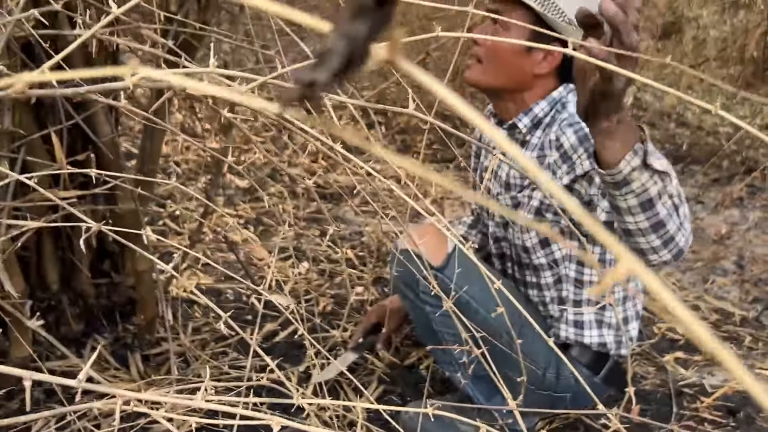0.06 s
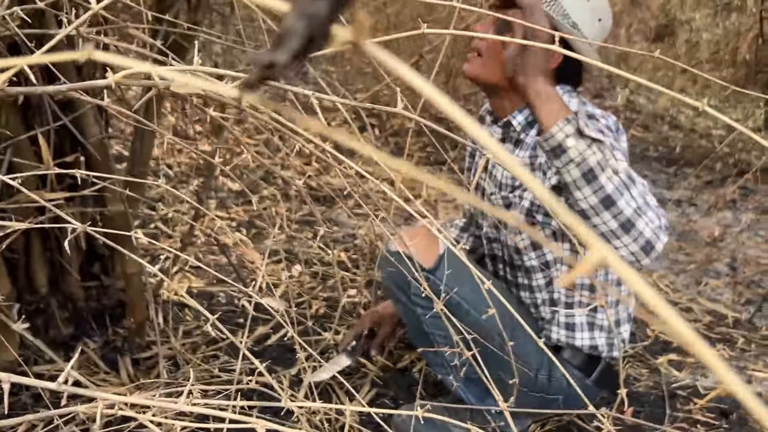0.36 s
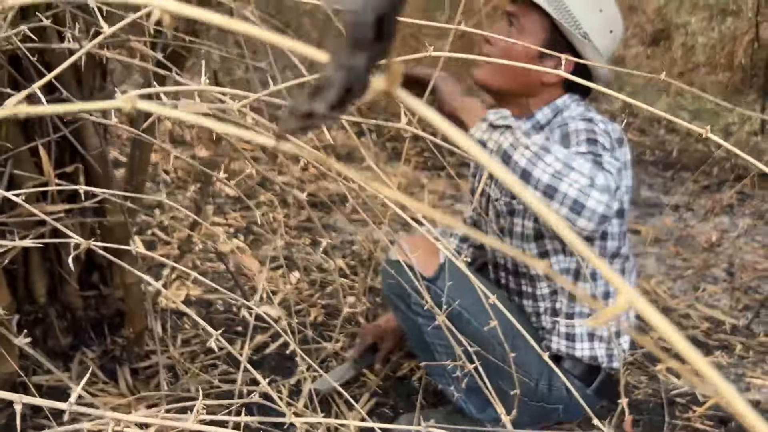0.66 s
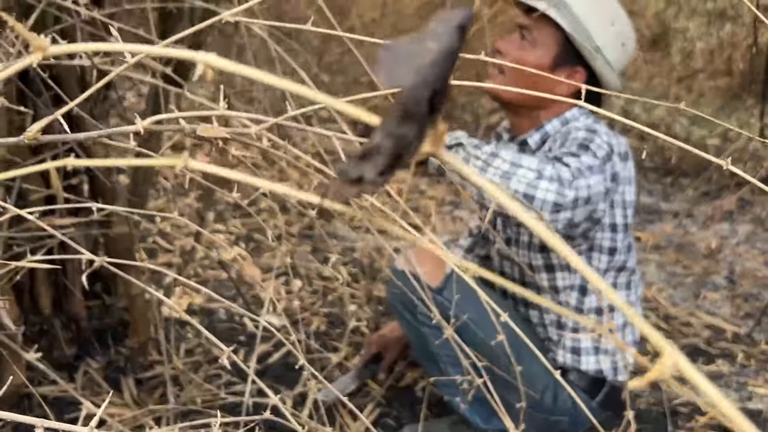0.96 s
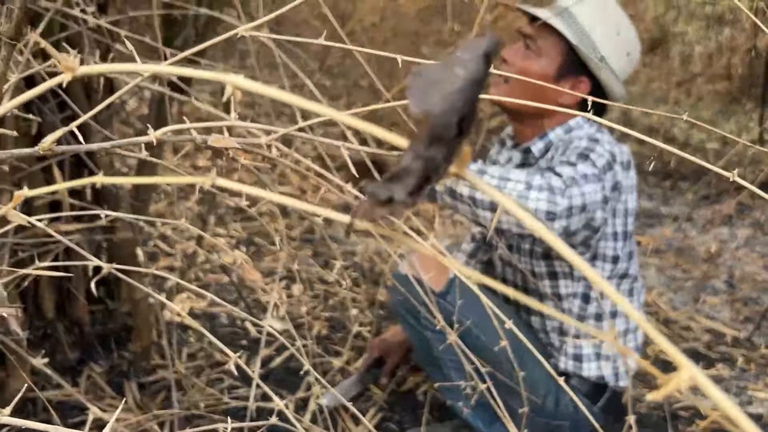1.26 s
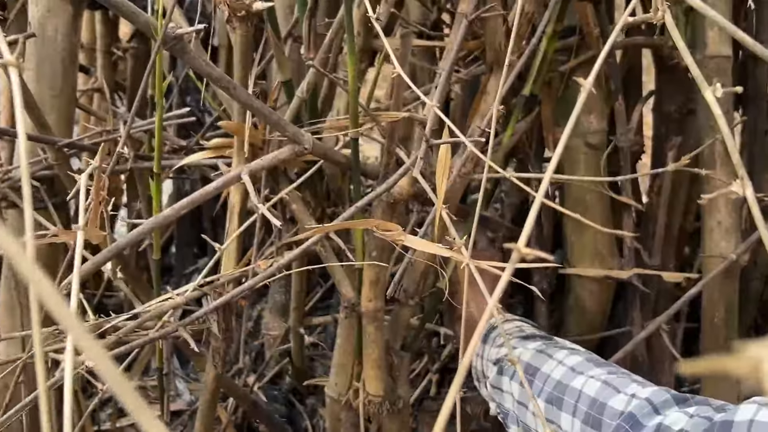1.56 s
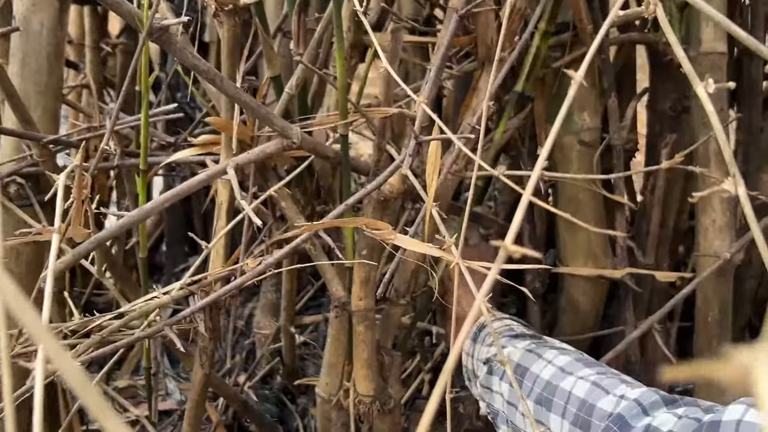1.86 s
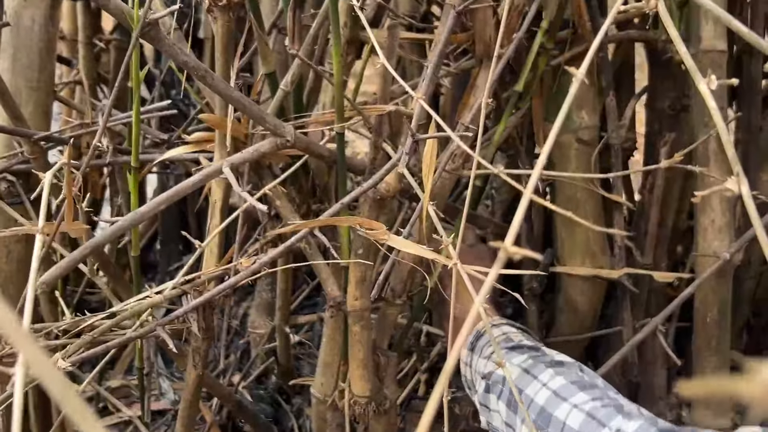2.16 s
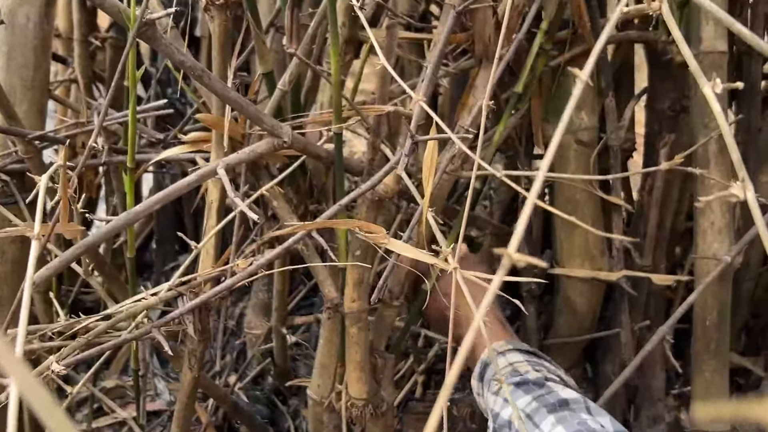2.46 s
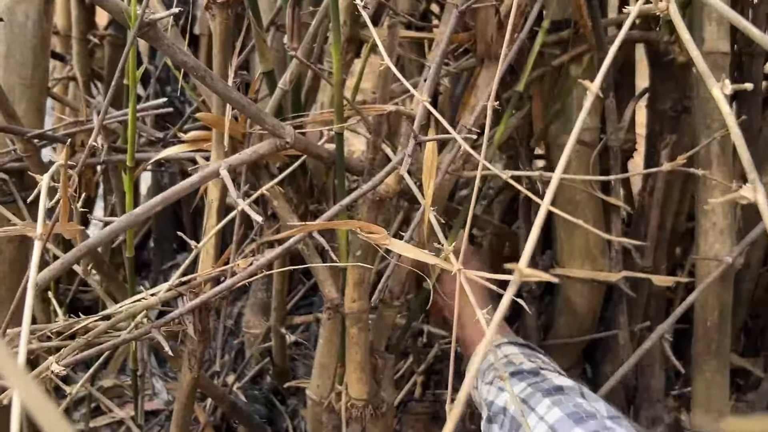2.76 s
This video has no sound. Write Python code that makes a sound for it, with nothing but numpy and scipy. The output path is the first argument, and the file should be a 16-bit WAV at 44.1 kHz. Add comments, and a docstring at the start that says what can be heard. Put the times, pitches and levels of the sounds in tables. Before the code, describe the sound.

A hand works into a dry bamboo thicket outdoors, close to the microphone. It opens with a soft low bump and a tiny stem creak, then dead leaves rustle faintly with small twig ticks. The sound drops out for an instant at about 1.3 seconds. At 1.9 seconds a cane splits with one sharp crack, by far the loudest event. Thin twigs snap and leaves crackle from 2.3 to 3 seconds, then more sparsely, while a sleeve rubs softly on the stems. Two stems knock together sharply at 3.8 seconds, and a twig snaps at 4.1. From 5.4 to about 6.2 seconds comes a thicker, louder flurry of snaps and crisp rustling, with a few dull thuds. A low rumble of air on the microphone and a faint distant wash lie underneath throughout.

```python
"""Outdoors in a bamboo thicket, a hand pushes in among the dry stems.
One cane cracks loudly and twigs snap as their fibres tear. Dead leaves rustle and crackle with
countless tiny breaks, bumped stems knock, thud and creak, and a sleeve rubs along them.
Under it lie a low rumble of air on the microphone and a faint wash from far away.
The sound enters two close microphone openings (ports), and the level dips briefly once."""
import sys
import numpy as np
from scipy import signal
from scipy.fft import rfft, irfft
from scipy.io import wavfile
from scipy.ndimage import uniform_filter1d

SR = 44100
rng = np.random.default_rng(int(sys.argv[2]) if len(sys.argv) > 2 else 0)


def master_out(mix):
    """Clip the mix to full scale and print it as 16-bit PCM to the path in sys.argv[1]."""
    frames = np.transpose(np.atleast_2d(mix))
    ceiling = np.clip(frames, -1, 1)
    pcm = np.round(ceiling * 32767).astype(np.int16)
    wavfile.write(sys.argv[1], SR, pcm)


N = 283322
TIME = np.arange(N) / SR
HZ = np.fft.rfftfreq(N, 1 / SR)

# A "colour" says how strong each frequency is. A "mode" is a note that an object rings at.
CANE_CRACKS = [(1.8764, -14)]  # the cane splitting: t/s, level/dB
CANE_MODES = [(410, 44, -13), (2197, 100, -5.5), (3370, 100, -65), (5000, 260, 6), (5380, 110, -16.5),
              (6000, 110, -4.5), (7040, 170, 11), (7500, 390, -18.5), (8170, 130, 5.5), (9320, 120, -4),
              (10300, 72, -28.5), (10600, 180, -52.5)]  # its ringing wall: f/Hz, width/Hz, level/dB
FIBRE_COLOUR = [(100, -37), (400, -5.5), (1400, 1), (3500, 12.5), (7000, -1.5), (10000, 14), (12000, -6),
                (15700, -11.5)]  # its tearing fibres: f/Hz, level/dB
SHIVER_COLOUR = [(100, -20), (400, 3.5), (900, 2), (1400, 8.5), (2200, 5), (3500, -2), (8000, -2),
                 (11000, -8), (15700, -21)]  # the split cane shaking: f/Hz, level/dB
TWIG_SNAPS = [(0.083, -52.5, 3580, 0.0033), (0.5735, -50, 4400, 0.004), (0.607, -56.5, 4990, 0.0025),
              (0.7285, -41.5, 6000, 0.0028), (0.8051, -46.5, 6200, 0.0032), (0.8272, -51, 5270, 0.003),
              (0.852, -59, 5070, 0.0065), (0.9063, -58, 5000, 0.0054), (1.002, -53.5, 6300, 0.0072),
              (1.0757, -49.5, 5760, 0.0055), (1.2067, -54, 6760, 0.0018), (1.4621, -53, 4670, 0.0078),
              (1.917, -40, 7740, 0.006), (2.079, -60, 7440, 0.0041), (2.096, -53, 3900, 0.0029),
              (2.208, -62, 8000, 0.0052), (2.3301, -36.5, 7500, 0.0034), (2.3357, -38, 8120, 0.0053),
              (2.3475, -48, 7240, 0.0045), (2.3594, -43.5, 8000, 0.0095), (2.39, -48.5, 7010, 0.0053),
              (2.5196, -48, 8030, 0.0069), (2.6148, -46, 8400, 0.0037), (2.7193, -45, 7690, 0.006),
              (2.913, -49.5, 7340, 0.0051), (3.115, -56, 5860, 0.0056), (3.3982, -51, 4730, 0.0017),
              (3.7735, -39.5, 3350, 0.0054), (3.9188, -52.5, 8200, 0.0076), (4.0205, -47, 8500, 0.0065),
              (4.1024, -38, 7500, 0.0057), (4.5396, -54, 6730, 0.012), (4.617, -55, 5000, 0.0045),
              (4.8526, -53, 8380, 0.011), (4.9457, -55.5, 2620, 0.0096), (5.1062, -52.5, 7600, 0.009),
              (5.1978, -53.5, 7260, 0.0024), (5.3705, -47.5, 8000, 0.0072), (5.4209, -37.5, 6000, 0.0024),
              (5.5064, -34, 6610, 0.0046), (5.5216, -31.5, 8950, 0.0048), (5.537, -31.5, 5500, 0.0031),
              (5.5484, -46, 7110, 0.0049), (5.6935, -48, 7700, 0.003), (5.876, -30.5, 8700, 0.0011),
              (5.9289, -41.5, 4060, 0.008), (5.9492, -35, 8000, 0.0044), (5.9554, -38.5, 5900, 0.0057),
              (5.985, -37.5, 7100, 0.0053), (6.006, -39.5, 7070, 0.006), (6.0112, -45, 7980, 0.006),
              (6.0695, -39, 6000, 0.0068), (6.099, -44, 7370, 0.0055)]  # twigs breaking: t/s, level/dB, centre f/Hz, length/s
TWIG_COLOUR = [(100, -64.5), (500, 10.5), (1500, -1.5), (3200, 4), (5000, 6.5), (8000, 8), (10000, 7.5),
               (12000, -2), (15700, -12)]  # shared by all twigs: f/Hz, level/dB
# the hand brushing the leaves: t/s, length/s, level/dB, fizz (top treble) compared with that level/dB
HAND_BRUSHES = [(0.0, 0.083, -67, -4), (0.125, 0.1, -67.5, -6), (0.348, 0.21, -71, -3.5),
                (0.493, 0.045, -60, -4), (0.574, 0.13, -62, 0), (0.76, 0.12, -65, -4.5),
                (0.86, 0.31, -71, -5), (1.401, 0.038, -65, -5), (1.58, 0.0094, -69, -6.5),
                (1.792, .06, -62.5, -8), (1.887, 0.057, -53.5, 1.5), (2.069, 0.074, -66.5, -0.5),
                (2.237, 0.056, -70.5, -1), (2.319, 0.028, -54.5, -3.5), (2.46, 0.18, -59.5, 1),
                (2.649, 0.12, -56, -0.5), (2.776, 0.094, -63, -2), (2.942, 0.046, -71, 4.5),
                (3.125, 0.047, -67.5, -2.5), (3.159, 0.13, -61.5, -2), (3.367, 0.067, -62.5, -3.5),
                (3.587, 0.038, -66.5, -1.5), (3.651, 0.16, -70.5, 5.5), (3.846, 0.046, -71.5, -2),
                (3.985, 0.033, -67, 5), (4.1, .06, -62, -3), (4.194, 0.068, -66, 2.5),
                (4.297, 0.085, -73.5, -6), (4.529, .015, -69.5, -2), (4.589, 0.024, -65, -2.5),
                (4.785, .08, -69.5, 3.5), (4.939, 0.068, -65.5, 0.5), (5.098, 0.034, -71, 0),
                (5.143, 0.054, -73, -1), (5.313, 0.28, -62, 0.5), (5.5, 0.027, -46, 0.5),
                (5.517, 0.44, -58.5, 1.5), (5.898, 0.1, -51, -5), (6.05, 0.064, -56.5, -1),
                (6.087, .12, -58.5, -6), (6.284, 0.23, -68, -10)]
LEAF_COLOUR = [(100, -28), (700, -5), (1700, -4.5), (2400, 0), (4800, 1), (6200, -1.5), (8200, 2),
               (10000, -1), (12000, -15), (14000, -21.5), (15700, -23.5)]  # dead leaves rustling: f/Hz, level/dB
FAR_LEAF_COLOUR = [(1500, -4), (5000, 4), (9500, -1.5), (12000, -6), (15700, -8)]  # extra tint on the first, farther leaves: f/Hz, level/dB
CRINKLE_COLOUR = [(500, -22), (2000, -5), (4500, -3.5), (8000, -0.5), (12000, -13.5), (15700, -16.5)]  # leaf veins popping: f/Hz, level/dB
STEM_TAPS = [(3.3182, -52, 1300), (3.318, -49, 2600), (3.7736, -31, 3340), (4.1029, -50.5, 3660),
             (5.4222, -43.5, 3310), (5.507, -39, 3190)]  # thin stems knocking together: t/s, level/dB, f/Hz
TAP_MODES = [(.8, 241, -10.5), (1, 230, 2), (1.14, 260, -12), (1.29, 300, -6), (1.75, 502, -13)]  # a thin stem ringing: multiple of its pitch, width/Hz, level/dB
STEM_THUDS = [(0.002, -33, 95.3, 0.016), (1.287, -55, 564, 0.014), (1.879, -42, 506, 0.011),
              (1.975, -56, 410, 0.01), (2.521, -55.5, 512, 0.017), (2.691, -57, 544, 0.0035),
              (3.392, -59.5, 570, .014), (3.777, -56, 854, 0.015), (4.541, -53.5, 599, 0.0168),
              (5.008, -55.5, 404, 0.013), (5.745, -49, 87.5, 0.043), (6.055, -43, 87, 0.012),
              (6.124, -45.5, 82, 0.051)]  # bumped stems: t/s, level/dB, starting f/Hz, decay/s
HOLLOW_MODES = [(572, 30, 8), (940, 190, -8.5), (1400, 115, -1.5), (1550, 100, -41), (2760, 470, -17.5)]  # the hollow of the creaking stem: f/Hz, width/Hz, level/dB
CREAK_COLOUR = [(120, -22), (280, -3), (450, 3), (1700, -1.5), (3000, -6), (5000, -10), (12000, -40)]  # the creak: f/Hz, level/dB
SLEEVE_RUBS = [(0.0, 0.067, -66), (0.1, 0.99, -77.5), (1.39, 0.45, -71.5), (1.88, 0.098, -62),
               (2.13, 0.064, -68), (2.345, 0.043, -71.5), (2.51, 0.082, -68), (2.665, 0.1, -65.5),
               (3.375, 0.042, -68), (3.77, 0.055, -73), (4.535, 0.027, -67), (4.95, .2, -75),
               (5.34, 0.1, -70.5), (5.505, 0.11, -58.5), (5.6, 0.38, -59.5), (6.05, .3, -65)]  # the sleeve sliding on stems: t/s, length/s, level/dB
RUB_COLOUR = [(40, -18), (130, 1), (350, 2), (550, -4.5), (800, -8.5), (1300, -17.5), (2200, -17),
              (5000, -39)]  # cloth rubbing: f/Hz, level/dB
SCRAPE_COLOUR = [(200, -22), (450, -4), (750, 1), (1300, -6), (2200, -15.5), (5000, -30)]  # cloth pressed hard: f/Hz, level/dB
AIR_PUFFS = [(0.0, 0.024, -49.5), (0.18, 0.049, -61.5), (1.88, 0.066, -57.5), (4.55, 0.056, -66.5),
             (5.72, 0.17, -60.5), (6.04, 0.075, -59)]  # puffs hitting the microphone: t/s, length/s, level/dB
DRAUGHT_LEVELS = [(0.0, -67.5), (1.2, -75.5), (2.05, -62.5), (2.4, -73.5), (3.7, -76), (4.4, -72.5),
                  (4.75, -67.5), (5.5, -69.5), (6.42, -59.5)]  # the draught between puffs: t/s, level/dB
RUMBLE_COLOUR = [(10, -28), (30, -17), (55, 3.5), (80, -0.5), (125, -7), (220, -16), (600, -50.5),
                 (2000, -76)]  # puffs and draught: f/Hz, level/dB
AIR_LEVELS = [(0.0, -69), (0.3, -69.5), (0.55, -74), (2.3, -79), (2.7, -74.5), (3.7, -75), (4.2, -71),
              (6.42, -69.5)]  # distant outdoor air: t/s, level/dB
AIR_COLOUR = [(30, -8), (100, -7), (300, -8.5), (650, -5.5), (1100, 6.5), (1450, 3), (1850, -20.5),
              (2600, -12), (5000, -17.5), (9000, -24), (14000, -57.5)]  # its wash: f/Hz, level/dB
AIR_LEAN = [(200, 1.5), (650, 0.5), (1250, 7.5), (1900, 22), (3000, 2), (9000, 13.5)]  # its balance: f/Hz, left minus right level/dB
PORT_PHASE = [(60, 0), (600, -.4), (1450, -1.2), (2200, .5), (4600, .35), (6100, -.9), (7000, .25),
              (8100, -.3), (9600, -3.14), (11400, -6.1), (12400, -6.6), (13600, -9.4), (15000, -12.4)]  # how far the left port leads the right: f/Hz, phase/rad
PORT_LEAN = [(100, 0), (500, -2), (1300, -1), (2400, 2), (4400, 1.5), (8000, 0)]  # balance of the ports: f/Hz, left minus right level/dB

DIP_START_S, DIP_END_S = 1.337, 1.39


def cane_crack(fibres_db=-6, shiver_db=-21, shiver_s=0.018):
    """The cane splits: a run of tearing fibres, the short ring of its wall, then a darker shiver."""
    t, out = np.arange(8192) / SR, np.zeros(N)
    for start, db in CANE_CRACKS:
        pops = tear(t, length_s=.003, spiky_db=1.5, after_db=-16, after_s=.006)
        fibres = amp(fibres_db) * peaked(tint(pops, FIBRE_COLOUR))
        split = peaked(fibres + peaked(ring(CANE_MODES, t)))
        shiver = unit(tint(rng.standard_normal(len(t)), SHIVER_COLOUR)) * np.exp(-t / shiver_s)
        fade = np.cos(np.pi / 2 * t / t[-1])
        add(out, start, amp(db) * (split + amp(shiver_db) * shiver) * fade)
    return out


def twig_snaps(focus_db=5, shiver_db=-21):
    """Twigs tear, thin ones high and thick ones lower. One pop stands out, and big twigs shiver on."""
    t, out = np.arange(-256, 3840) / SR, np.zeros(N)
    hz = np.geomspace(100, 16000, num=24)
    for start, db, centre_hz, length_s in TWIG_SNAPS:
        own_colour = np.transpose([hz, -focus_db * np.log1p(2 * np.log2(hz / centre_hz) ** 2)])
        hardest_pop = 1 + 0.48 * np.exp(-((t - length_s / 4) / 0.00072) ** 2)
        pops = tear(t, length_s, spiky_db=3, after_db=shiver_db + max(db + 40, 0), after_s=0.0057)
        pops = chance_modes(pops * hardest_pop, ripple_db=4, width_bins=30)
        snap = tint(tint(pops, TWIG_COLOUR), own_colour) * (t >= 0)
        add(out, start + t[0], amp(db) * peaked(snap))
    return out


def tear(t, length_s, spiky_db, after_db, after_s):
    """Fibres give way in a quick run of uneven pops, and the splinters shiver on after it."""
    noise, sizes = rng.standard_normal((2, len(t)))
    age = np.maximum(t, 0)
    fade = np.exp(-(age / length_s) ** 2) + amp(after_db) * np.exp(-age / after_s)
    return (t >= 0) * fade * noise * amp(spiky_db * unit(smooth(sizes, 12)))


def chance_modes(x, ripple_db, width_bins):
    """Each twig favours its own random set of frequencies."""
    spectrum = rfft(x)
    bumps = smooth(smooth(rng.standard_normal(len(spectrum)), width_bins), width_bins)
    return irfft(spectrum * amp(ripple_db * unit(bumps)), len(x))


def leaf_rustle(per_s=1500, clump_db=2.5, grain_s=0.0016, level_db=-0.5, fizz_db=-0.5):
    """Countless tiny breaks come in clumps, over the hiss of leaf sliding on leaf."""
    breaks = random_clicks(per_s, size_db=1.5, limit=4.5)
    power = signal.lfilter([1], [1, -np.exp(-2 / (grain_s * SR))], breaks ** 2)  # each dies away
    clumps = unit(smooth(smooth(rng.standard_normal(N), 300), 150))
    strength = np.sqrt(power / power.mean() + 1) * amp(clump_db * clumps)  # the 1 is the hiss
    rustle = tint(leaf_folding(strength * rng.standard_normal((2, N))), LEAF_COLOUR)
    rustle /= band_rms(rustle, 2500, 8000)
    # thin leaf edges add fizz at the top, which reaches both ports nearly alike
    top = irfft(rfft(rustle) / (1 + np.exp((7300 - HZ) / 600)), N)
    edges = spread(top / band_rms(top, 8000, 12000), apart=.16)
    body, fizz = hand_brushing()
    sound = amp(level_db) * (body * spread(rustle - top, apart=.44) + amp(fizz_db) * fizz * edges)
    return np.where(TIME < DIP_START_S, tint(sound, FAR_LEAF_COLOUR), sound)


def leaf_folding(x, patch_db=2.5):
    """Papery tones come and go as the leaves fold."""
    spectra = signal.stft(x, nperseg=256, noverlap=192)[2]
    patches = smooth(rng.standard_normal(spectra.shape[1:]), 4, axis=0)  # across frequency
    patches = unit(smooth(patches, 24))  # across time
    return signal.istft(spectra * amp(patch_db * patches), nperseg=256, noverlap=192)[1][:, :N]


def hand_brushing(rest_db=-78.5, rest_fizz_db=-85.5):
    """How strongly the hand stirs the body and the fizz of the rustle; the leaves never quite rest."""
    body = [(start, length, db) for start, length, db, _ in HAND_BRUSHES]
    fizz = [(start, length, db + extra_db) for start, length, db, extra_db in HAND_BRUSHES]
    shape = dict(rise=0.46, release_s=0.033, linger=0.27)
    return (np.hypot(swells(body, **shape), amp(rest_db)),
            np.hypot(swells(fizz, **shape), amp(rest_fizz_db)))


def leaf_crinkles(per_s=70, level_db=-9, decay_s=.0005):
    """Brittle leaf veins pop out of the rustle, louder when the hand brushes harder."""
    veins = random_clicks(per_s, size_db=3, limit=3.5)
    pops = signal.lfilter([1], [1, -np.exp(-1 / (decay_s * SR))], veins) * rng.standard_normal(N)
    body, _ = hand_brushing()
    return amp(level_db) * body * unit(tint(pops, CRINKLE_COLOUR))


def stem_taps(level_db=-0.5, chatter_s=.002):
    """A hollow stem chatters three times against its neighbour and rings for a few milliseconds."""
    t, out = np.arange(2048) / SR, np.zeros(N)
    onset = 1 - np.exp(-t / 0.000073)
    for start, db, hz in STEM_TAPS:
        modes = [(multiple * hz, width, mode_db) for multiple, width, mode_db in TAP_MODES]
        knock = np.zeros(len(t))
        for contact, contact_db in enumerate([0, 1, -5]):
            add(knock, contact * chatter_s, amp(contact_db) * ring(modes, t) * onset)
        add(out, start, amp(db + level_db) * peaked(knock))
    return out


def stem_thuds(sag_s=0.047, clean_share=0.66):
    """Bending waves run along a bumped stem. The high ones arrive first, so the dull pitch sags."""
    t, out = np.arange(8192) / SR, np.zeros(N)
    for start, db, hz, decay_s in STEM_THUDS:
        tone = np.exp(2j * np.pi * np.cumsum(hz / (1 + t / sag_s)) / SR)
        # neighbouring stems shake along and blur the pitch
        shake = unit(smooth(rng.standard_normal((2, len(t))), int(SR / hz)))
        blur = clean_share + (1 - clean_share) * (shake[0] + 1j * shake[1])
        age = 2 * t / decay_s
        thud = (tone * blur).real * age * np.exp(1 - age)
        add(out, start, amp(db) * thud / abs(thud).max())
    return out


def stem_creak(start_s=.019, swell_s=0.021, level_db=-35, slips_per_s=700):
    """Quick, uneven slips ring a hollow stem. The creak swells as the stem is loaded, then lets go."""
    t, out = np.arange(0, 2 * swell_s, 1 / SR), np.zeros(N)
    slips = (rng.random(len(t)) < slips_per_s / SR) + 0.01 * rng.standard_normal(len(t))
    tone = signal.fftconvolve(slips, ring(HOLLOW_MODES, t))[:len(t)]
    tone /= np.sqrt(smooth(tone ** 2, 300) + 1e-12)  # even out the loudness
    past_peak_s = t - swell_s
    swell_db = np.minimum(650 * past_peak_s, -2500 * past_peak_s)  # rise and fall in dB per second
    add(out, start_s, amp(level_db + swell_db) * tone)
    return tint(out, CREAK_COLOUR) * amp([[3], [-2]])  # louder on the left


def sleeve_rub(level_db=-2, flutter_db=2, scrape_db=-4, firm_db=-60, rest_db=-78.5):
    """Cloth rubs unevenly on the stems. The firmer it presses, the more it scrapes in the middle range."""
    flutter = amp(flutter_db * unit(smooth(rng.standard_normal(N), 800)))
    rub, scrape = noise_pair(RUB_COLOUR) * flutter, noise_pair(SCRAPE_COLOUR) * flutter
    rub /= band_rms(rub, 180, 800)
    scrape /= band_rms(scrape, 180, 800)
    force = np.hypot(swells(SLEEVE_RUBS, rise=.3, release_s=0.051, linger=.1), amp(rest_db))
    pressed = amp(scrape_db) * np.minimum(force / amp(firm_db), 1) ** 0.95
    return amp(level_db) * force * spread(rub + pressed * scrape, apart=0.52)


def air_rumble():
    """A draught and puffs of air buffet the microphone with a low rumble."""
    puffs = swells(AIR_PUFFS, rise=0.26, release_s=0.04, linger=0.24)
    flow = np.hypot(amp(curve(DRAUGHT_LEVELS)), puffs)
    return flow * spread(unit(noise_pair(RUMBLE_COLOUR)), apart=0.16)


def distant_air(level_db=3):
    """A faint wash from far away, nearly unrelated at the two ports."""
    wash = noise_pair(AIR_COLOUR)
    wash /= band_rms(wash, 900, 1600)
    return amp(curve(AIR_LEVELS) + level_db) * lean(spread(wash, apart=1), AIR_LEAN)


def thicket_echo(x, echo_db=-17, fade_s=0.071):
    """Stems and ground scatter a short, faint tail, different at each port."""
    t = np.arange(SR // 3) / SR
    echoes = rng.standard_normal((2, len(t))) * (rng.random((2, len(t))) < .1)
    echoes *= (t > .003) * amp(-60 * t / fade_s)
    echoes /= np.linalg.norm(echoes, axis=1, keepdims=True)
    return x + amp(echo_db) * signal.fftconvolve(x[None], echoes, axes=1)[:, :N]


def ports(x):
    """Each frequency reaches the two ports with its own timing and level."""
    phase_shift = np.exp(1j * np.outer([.5, -.5], read(PORT_PHASE, HZ)))
    return lean(irfft(rfft(x) * phase_shift, N), PORT_LEAN)


def ring(modes, t):
    """Fading notes added up; a wide mode starts louder and dies sooner."""
    return sum(amp(db) * width * np.exp(-np.pi * width * t) * np.sin(2 * np.pi * (hz * t + rng.random()))
               for hz, width, db in modes)


def swells(rows, rise, release_s, linger):
    """Each stroke rises for a share of its length, holds, then fades; long ones linger more."""
    power = np.zeros(N)
    for start, length_s, db in rows:
        t = np.arange(0, 2 * length_s + .3, 1 / SR)
        attack = np.sin(np.pi / 2 * np.minimum(t / (rise * length_s), 1))
        release = np.exp(-np.maximum(t - length_s, 0) / (release_s + linger * length_s))
        add(power, start, (amp(db) * attack * release) ** 2)
    return np.sqrt(power)


def random_clicks(per_s, size_db, limit):
    """Clicks at random times, most of them small and a few big."""
    sizes = amp(size_db * np.minimum(rng.exponential(1, N), limit))
    return sizes * (rng.random(N) < per_s / SR)


def noise_pair(colour):
    """Two unrelated noises of the same colour."""
    return tint(rng.standard_normal((2, N)), colour)


def tint(x, colour):
    """Turns each frequency up or down as a colour table says."""
    hz = np.fft.rfftfreq(x.shape[-1], 1 / SR)
    return irfft(rfft(x) * amp(read(colour, hz)), x.shape[-1])


def spread(pair, apart):
    """Left and right from one shared signal and one that sets them apart."""
    shared, side = pair
    return np.array([shared + apart * side, shared - apart * side]) / np.sqrt(1 + apart ** 2)


def lean(x, table):
    """Tips each frequency toward the left or right."""
    return irfft(rfft(x) * amp(np.outer([.5, -.5], read(table, HZ))), N)


def read(table, hz):
    """Looks up frequencies in a table, on a log scale."""
    table_hz, value = np.transpose(table)
    return np.interp(np.log(hz + 1), np.log(table_hz + 1), value)


def curve(rows):
    """Joins points in time with straight lines."""
    return np.interp(TIME, *np.transpose(rows))


def add(mix, start_s, sound):
    """Mixes a sound in at its start time."""
    part = mix[max(round(start_s * SR), 0):][:len(sound)]
    part += sound[:len(part)]


def smooth(x, size, axis=-1):
    """A moving average over size points."""
    return uniform_filter1d(x, size, axis=axis)


def amp(db):
    """Turns decibels into a gain."""
    return 10 ** (np.asarray(db) / 20)


def unit(x):
    """Scales to an average strength (rms) of 1."""
    return x / np.sqrt(np.mean(x ** 2) + 1e-20)


def peaked(x):
    """Scales so that the loudest moment has strength 1."""
    return x / np.sqrt(smooth(x ** 2, 64).max())


def band_rms(x, low_hz, high_hz):
    """The average strength between two frequencies."""
    band = irfft(rfft(x) * ((HZ > low_hz) & (HZ < high_hz)), N)
    return np.sqrt(np.mean(band ** 2))


def scene():
    """The near sounds pass through the ports, over distant air and rumble."""
    hits = twig_snaps() + leaf_crinkles() + stem_taps() + cane_crack() + stem_thuds()
    near = thicket_echo(hits) + leaf_rustle() + sleeve_rub() + stem_creak()
    return ports(near) + distant_air() + air_rumble()


def record(dry, dip_db=-40, cutoff_hz=16100):
    """The level dips briefly to near silence, and the highest treble is cut off."""
    outside_dip = smooth(1. * ((TIME < DIP_START_S) | (TIME > DIP_END_S)), 200)
    gain = outside_dip + amp(dip_db) * (1 - outside_dip)
    low_pass = signal.firwin(511, cutoff_hz, window=("kaiser", 9), fs=SR)
    return signal.oaconvolve(dry * gain, low_pass[None], "same")


dry = scene()
out = record(dry)
master_out(out)
```